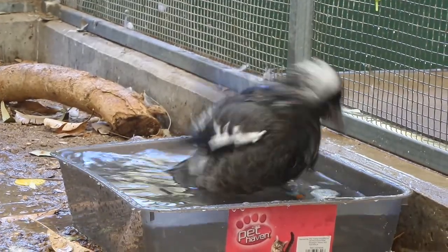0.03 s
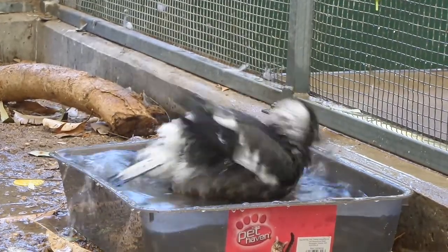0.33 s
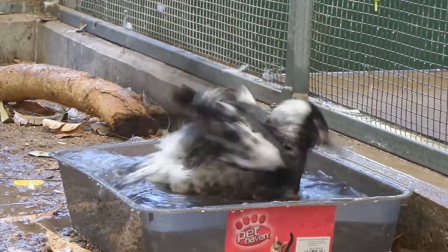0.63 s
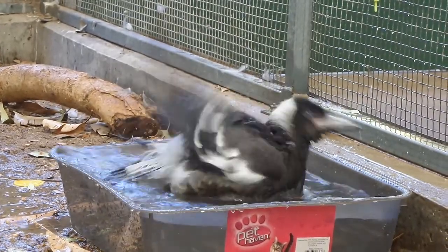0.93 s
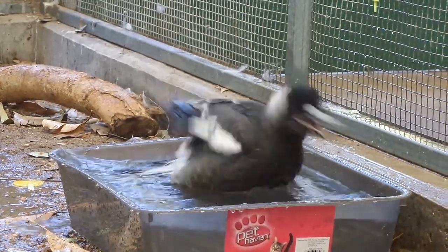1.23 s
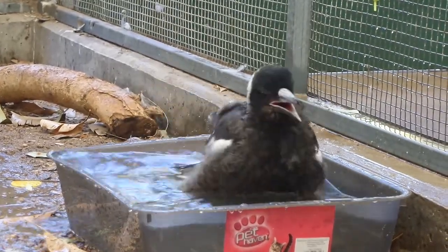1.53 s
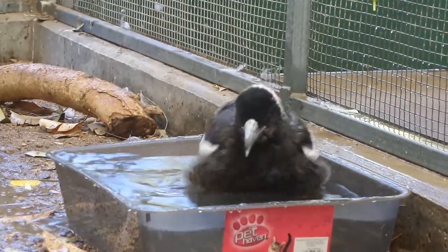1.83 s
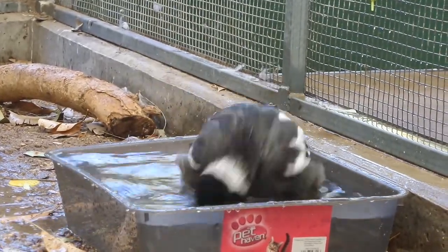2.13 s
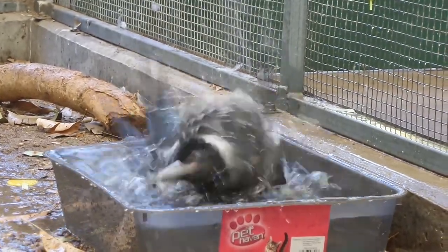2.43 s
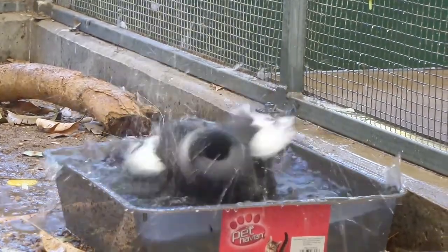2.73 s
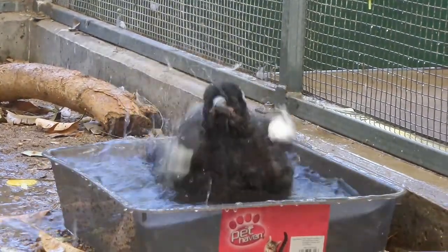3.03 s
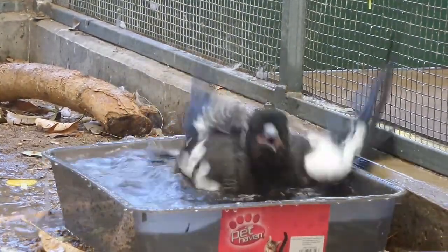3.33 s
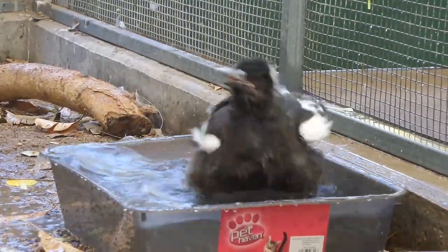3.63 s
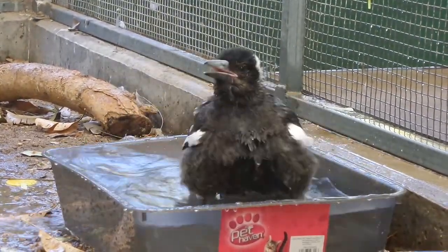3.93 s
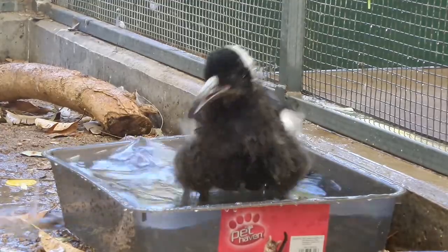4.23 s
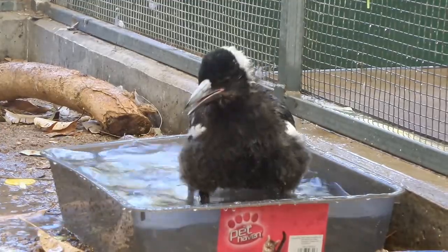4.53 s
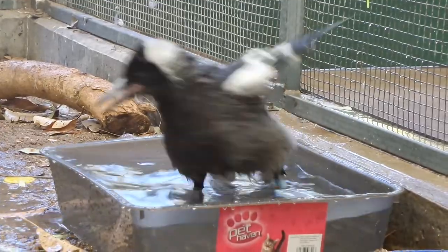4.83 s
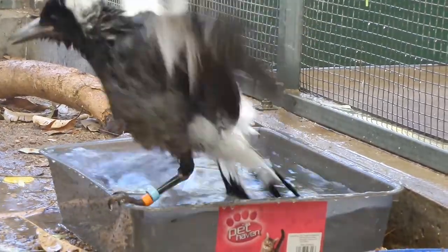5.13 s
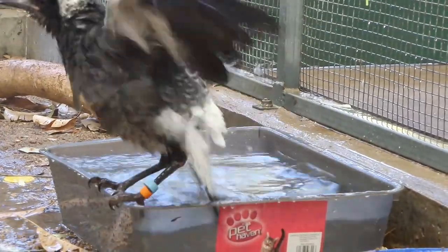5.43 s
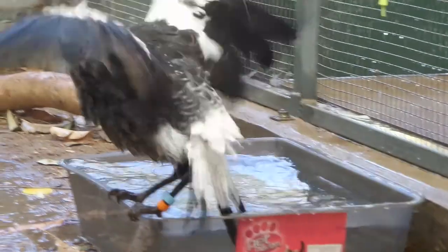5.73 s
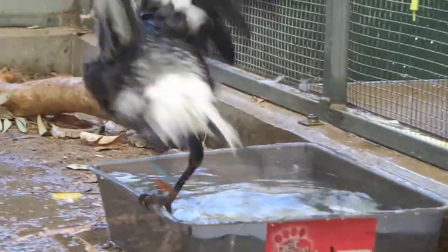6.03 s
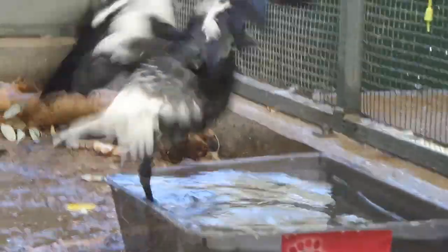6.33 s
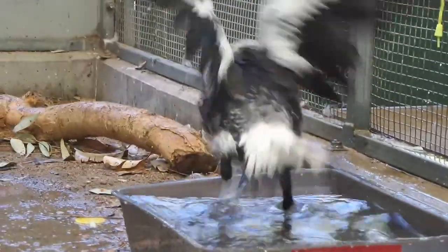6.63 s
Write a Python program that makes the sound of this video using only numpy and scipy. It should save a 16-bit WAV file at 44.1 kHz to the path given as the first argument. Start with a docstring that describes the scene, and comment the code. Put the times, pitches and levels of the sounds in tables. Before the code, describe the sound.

A young magpie bathes in a plastic tub, its wet feathers swishing and throwing spray in quick bouts while the water slops. It gives a short growl, a few whines, then a run of harsh squawks over the heaviest splashing. After a lull with small calls, the flapping returns with more whines and ends with a dull knock on the tub. The sound is close, in an outdoor pen with soft hiss.

```python
"""Magpie in a bathtub

A young magpie thrashes its wet feathers in a plastic tub, throwing spray and slopping the water.
It growls, whines, whistles and squawks with the two sides of its syrinx. Drops and claws tick on the
plastic, and with the last flap a foot knocks the tub. The low concrete walls of the pen answer;
behind it all lie a soft outdoor hiss and a faint machine hum."""
import sys
import numpy as np
from scipy import signal
from scipy.fft import rfft, irfft, next_fast_len
from scipy.io import wavfile
from scipy.ndimage import uniform_filter1d, map_coordinates

SR = 44100
rng = np.random.default_rng(int(sys.argv[2]) if len(sys.argv) > 2 else 0)


def digitize_waveform(pressure):
    """Quantize a signal to 16-bit integers and store it at the path in sys.argv[1].

    Rows of a 2-D input are taken as channels; values are limited to [-1, 1].
    """
    field = np.atleast_2d(pressure).T
    bounded = np.clip(field, -1, 1)
    quanta = np.round(bounded * 32767).astype(np.int16)
    wavfile.write(sys.argv[1], SR, quanta)


N = 295029

# bouts of feather shaking: start_s, length_s, attack_s, first_db, middle_db, last_db, slop_db
BOUTS = [(0, 0.39, 0.023, -42, -42, -37, -77), (0.64, 0.98, 0.021, -42, -37.5, -41, -62),
         (1.797, 0.816, 0.019, -41.5, -39.5, -36, -59), (2.745, .8, 0.0069, -38.5, -37.3, -38.5, -54),
         (5.27, 1, 0.089, -45.5, -41.5, -38.3, -68), (6.425, 0.25, 0.0083, -34.5, -36.5, -37.5, -52)]
# the throat's colour on noisy calls: freq_hz, gain_db
THROAT = [(600, -54), (900, 4), (1500, -10.5), (1950, 12.5), (2450, 4.5), (2900, 0.5), (3400, 4),
          (3900, -17), (6000, -46)]


def amp(db):
    """Decibels to gain."""
    return 10 ** (np.asarray(db) / 20)


def unit(x):
    """x at rms 1."""
    return x / np.sqrt(np.mean(x ** 2) + 1e-20)


def along(points, hz):
    """A curve of (Hz, value) points, read on a log axis."""
    freqs, values = np.transpose(points)
    return np.interp(np.log(hz + 1), np.log(freqs + 1), values)


def arc(u, first, middle, last):
    """A smooth bend through three values as u goes from 0 to 1."""
    return first + (last - first) * u + (middle - (first + last) / 2) * 4 * u * (1 - u)


def wobble(rate, size):
    """A smooth random curve, rate knots a second."""
    knots = rng.standard_normal(size // 8 + 8)
    return map_coordinates(knots, [np.arange(size) * rate / SR], mode="wrap")


def turns(hz):
    """Running phase of a frequency curve."""
    return 2 * np.pi * np.cumsum(hz) / SR


def filtered(x, response):
    """x through a frequency response."""
    n = x.shape[-1]
    padded = next_fast_len(n + 8192)
    return irfft(rfft(x, padded) * response(np.fft.rfftfreq(padded, 1 / SR)), padded)[..., :n]


def coloured(x, spectrum):
    """x through a (Hz, dB) EQ curve, at rms 1."""
    return unit(filtered(x, lambda hz: amp(along(spectrum, hz))))


def spread(pair):
    """Two unrelated signals as left and right: narrow in the bass, wide in the treble."""
    # how alike the two sides are: freq_hz, correlation
    likeness = [(60, 0.84), (150, 0.85), (380, 0.67), (950, 0.22), (2380, -0.008), (5980, -0.0053),
                (15000, -0.0051)]

    def width(hz):
        angle = np.arccos(np.clip(along(likeness, hz), -1, 1)) / 2
        return np.array([np.cos(angle), np.sin(angle)])
    mid, side = filtered(pair, width)
    return unit(np.array([mid + side, mid - side]))


def direct(x, lag_s):
    """Sound straight from the tub reaches the left microphone first."""
    return filtered(x, lambda hz: np.exp(1j * np.pi * hz * lag_s * np.array([[1], [-1]])))


def add(track, start_s, x):
    """Mix x into the track from a start time."""
    i = max(0, round(start_s * SR))
    track[..., i:i + x.shape[-1]] += x[..., :max(0, N - i)]


def grains(count, hz, octaves, cycles, scatter_db, rise):
    """Bubbles or droplets at random moments: damped sines whose pitch rises as they die."""
    onsets = (rng.random(count) * N).astype(int)
    gains = amp(scatter_db * np.minimum(rng.exponential(size=count), 4))
    pitch = np.clip(hz * 2 ** (octaves * rng.standard_normal((count, 1))), 100, SR / 3)
    samples = np.arange(int(np.clip(5 * cycles * SR / hz, 16, 2000)))
    age = pitch * samples / SR / cycles
    waves = gains[:, None] * np.exp(-age) * np.sin(2 * np.pi * cycles * age * (1 + rise * age))
    return unit(np.bincount((onsets[:, None] + samples).ravel(), waves.ravel(), N)[:N])


def shaking(t, release_s=0.049, drip_db=-4):
    """Spray envelope: bouts start fast, hold and die away, over drips that follow the slopping."""
    # hard wing strokes that throw a sheet of spray: centre_s, level_db, half_length_s
    flings = [(1.355, -47, 0.017), (2.166, -39.5, 0.075), (2.34, -33, 0.069), (2.811, -30.5, 0.019),
              (3, -36.5, 0.038), (5.44, -43, .05)]
    power = (amp(drip_db) * slopping(t)) ** 2
    power += sum((amp(db) * np.exp(-((t - centre) / half) ** 2)) ** 2 for centre, db, half in flings)
    for start, length, attack, *levels_db, _ in BOUTS:
        age = t - start
        gate = np.clip(1 + age / attack, 0, 1) * np.exp(-np.maximum(age - length, 0) / release_s)
        power += (gate * amp(arc(np.clip(age / length, 0, 1), *levels_db))) ** 2
    return np.sqrt(power)


def patchy(x, depth_db):
    """The moving wings keep shifting the colour of x."""
    spectra = signal.stft(x, nperseg=512)[2]
    patches = uniform_filter1d(rng.standard_normal(spectra.shape[1:]), size=4, axis=0)
    patches = uniform_filter1d(patches, size=14, axis=1)
    return signal.istft(spectra * amp(depth_db * unit(patches)), nperseg=512)[1][:, :N]


def feathers():
    """Wet feathers swish through the water and shed fine droplets, partly heard off the walls."""
    # colour of the spray: freq_hz, gain_db
    spray = [(300, -35), (600, -19.5), (1100, -11), (1500, -3.5), (2100, -3), (2650, -4), (3300, -6),
             (4200, 0), (4750, -2), (5900, -0.5), (7000, -6), (8450, -1.5), (10400, -12.5), (16000, -14)]
    # hollow resonances in the swish: centre_hz, width_hz, gain_db
    hollows = [(2150, 350, 5), (4730, 260, 6), (5800, 300, 2), (8450, 600, 2)]

    def resonances(f):
        return amp(sum(db / (1 + (2 * (f - hz) / width) ** 2) for hz, width, db in hollows))
    droplets = np.array([grains(count=9000, hz=6000, octaves=.9, cycles=1, scatter_db=2.5, rise=.02)
                         for path in range(3)])
    swish = coloured(rng.standard_normal((3, N)) + .4 * droplets, spray)
    swish = filtered(patchy(swish, depth_db=1.1), resonances)
    ruffle_db = .35 * wobble(17, N) + .6 * wobble(38, N) + .65 * wobble(150, N)
    stereo = unit(spread(swish[:2]) + amp(-7.5) * unit(direct(swish[2], lag_s=.00041)))
    return shaking(np.arange(N) / SR) * amp(1.5 + ruffle_db) * stereo


def slopping(t, build_s=0.16, settle_s=0.24, ripple_db=-61.5):
    """Wave envelope: the water builds during each bout and settles to a ripple after it."""
    power = amp(ripple_db) ** 2
    for start, length, *_, slop_db in BOUTS:
        built = 1 - np.exp(-np.clip(t - start, 0, length) / build_s)
        settling = np.exp(-np.maximum(t - start - length, 0) / settle_s)
        power = power + (amp(slop_db) * built * settling) ** 2
    return np.sqrt(power)


def water(slap_attack_s=0.0052, slap_decay_s=0.083):
    """The slopping water traps bubbles; each wing slap stirs up a crackle of smaller ones."""
    # wings slapping up small waves: start_s, level_db
    slaps = [(1.188, -46.5), (1.37, -56), (2.596, -44.5), (6.425, -52)]
    # colour of the slop: freq_hz, gain_db
    bubble_eq = [(120, -60), (200, -20), (314, -21.5), (1180, -10), (1430, -24), (1600, -28), (2080, -33),
                 (3520, -120)]
    # colour of the slaps: freq_hz, gain_db
    churn_eq = [(250, -3), (600, -7), (1500, -4.5), (3000, -17), (6000, -19)]
    t = np.arange(N) / SR
    bubbles = np.array([grains(count=1800, hz=601.6, octaves=.677, cycles=8.24, scatter_db=-2, rise=.0823)
                        for ear in "LR"])
    churn = np.array([grains(count=8000, hz=1600, octaves=.7, cycles=2.5, scatter_db=2.5, rise=.04)
                      for ear in "LR"])
    stirred = np.zeros(N)
    for start, db in slaps:
        attack = np.clip((t - start) / slap_attack_s + 1, 0, 1)
        stirred += amp(db) * attack * np.exp(-np.maximum(t - start, 0) / slap_decay_s)
    slop = slopping(t) * spread(coloured(bubbles, bubble_eq))
    return slop + stirred * spread(coloured(churn, churn_eq))


def outdoors():
    """A bed of outdoor hiss and the hum of a distant machine."""
    # partials of the hum: pitch_hz, level_db
    partials = [(48.4, -67.5), (96.9, -70)]
    # colour of the hiss: freq_hz, gain_db
    air = [(22, -30), (45, -8), (115, -5), (250, -12.5), (320, -3.5), (394, -22), (512, -5.5), (850, -16),
           (1650, -3.5), (4400, -8), (7000, -6), (8600, -1.5), (12200, -11), (15800, -10)]
    t = np.arange(N) / SR
    hum = sum(amp(db) * unit(np.sin(2 * np.pi * hz * t + .08 * wobble(2.4, N))) for hz, db in partials)
    hiss = amp(-46 + 0.75 * wobble(5.36, N)) * spread(coloured(rng.standard_normal((2, N)), air))
    return hum + hiss


def sing(calls, voice, fade_s):
    """Play each call on a voice, faded at both ends; u runs from 0 to 1 through the call."""
    track = np.zeros(N)
    t = np.arange(SR // 2) / SR - fade_s
    for start, length, *shape in calls:
        gate = np.clip(1 + np.minimum(t, length - t) / fade_s, 0, 1)
        add(track, start - fade_s, gate * voice(np.clip(t / length, 0, 1), length, *shape))
    return track


def swell(u, swell_db, arch_db=2.5):
    """Level through a note in dB: an arch that leans towards its start or its end."""
    return arc(u, -arch_db, 0, -arch_db) + swell_db * (u - .5)


def flutter(rate_hz, uneven, size):
    """Uneven flapping of the syrinx: its phase, and its pulses at rms 1."""
    phase = turns(rate_hz * (1 + uneven * wobble(40.8, size)))
    return phase, unit((1 + np.cos(phase)) * amp(0.73 * wobble(53.5, size)))


def growls():
    """Slack membranes rattle on a sinking pitch: each pulse is a falling chirp with a burst of rasp."""
    # rattling growls: start_s, length_s, first_hz, last_hz, tone_db, rasp_db, swell_db
    calls = [(.24, .195, 852, 623, -43, -40.5, 0), (4.86, .14, 1040, 798, -41.5, -38.5, -5.5)]
    # colour of the rasp: freq_hz, gain_db
    rasp_eq = [(600, -26), (950, -11), (1300, -12.5), (2100, -6.5), (2600, -16), (3200, -23), (6000, -35)]
    # the throat's bass cut: freq_hz, gain_db
    gullet = [(430, -29), (600, -4)]

    def voice(u, length, first_hz, last_hz, tone_db, rasp_db, swell_db):
        n = len(u)
        pitch = first_hz * (last_hz / first_hz) ** u
        beat, pulses = flutter(rate_hz=72, uneven=0.058, size=n)
        phase = turns(pitch * (1 - .12 * np.sin(beat) + .075 * wobble(800, n)))
        tone = coloured(pulses * np.sin(phase), gullet)
        noise = coloured(rng.standard_normal(n) * (1 + 0.29 * np.cos(phase)), rasp_eq)
        rasp = unit((pulses + 5.5) * noise)
        return amp(swell(u, swell_db) + 2.5) * (amp(tone_db) * tone + amp(rasp_db) * rasp)
    return sing(calls, voice, fade_s=.008)


def tub():
    """Sharp ticks on the plastic, and the dull knock of the water-filled tub."""
    # drops and claws on the plastic: start_s, level_db, body_relative_db
    ticks = [(0.5144, -60, 3), (0.607, -55, -11), (1.331, -48, -25), (1.344, -50, -16), (2.302, -42, -6),
             (3.0007, -47, -11), (6.4249, -52.5, 3)]
    # a foot bumping the tub: start_s, level_db
    bumps = [(6.584, -32.5)]
    # the tub's modes: pitch_hz, level_db, t60_s
    modes = [(357, -12, 0.2), (453, 6.5, 0.044), (500, -5, 0.089)]
    track = np.zeros((2, N))
    t = np.arange(SR // 4) / SR

    def burst(eq, t60_s):
        return coloured(rng.standard_normal((2, len(t))), eq) * amp(-60 * t / t60_s)
    for start, db, body_db in ticks:
        crack = burst([(3000, -27), (7000, 4), (15000, -14)], t60_s=0.027)
        body = burst([(600, -17), (1500, 6), (4500, -4), (7000, -39)], t60_s=0.015)
        add(track, start, amp(db + 18.5) * (crack + amp(body_db + 1) * body))
    ring = sum(amp(db - 60 * t / t60) * np.sin(2 * np.pi * hz * t) for hz, db, t60 in modes)
    soft_attack = 1 - np.exp(-t / 0.0024)
    for start, db in bumps:
        add(track, start, amp(db - 5) * soft_attack * ring)
    return track


def whines(trill_growth=0.36):
    """The throat favours the second harmonic; a deepening trill chops it, bends it and makes it hoarse."""
    # begging notes: start_s, length_s, first_hz, middle_hz, last_hz, level_db, swell_db,
    # fundamental_relative_db, trill_depth
    calls = [(1.537, 0.0091, 847, 1010, 1160, -26.5, -3, -12, 0.36),
             (1.566, 0.052, 1181, 1194, 1170, -32, -13, -12, 0.66),
             (1.632, 0.11, 1153, 1074, 1050, -27.5, -8, -17.5, 0.67),
             (2.08, 0.088, 882, 886, 854, -35, -15, -39, 0.58),
             (3.911, 0.076, 877, 1035, 971, -27.5, -10.5, -19.5, 0.08),
             (4.277, 0.062, 1073, 1151, 1085, -33, -5, -10, 1),
             (4.365, 0.11, 1045, 992, 943, -35, 5, -8.5, 0.92),
             (5.645, 0.17, 1058, 1079, 1025, -41, -9, -1, 1),
             (5.862, 0.083, 864, 826, 913, -28.5, -6, -39, .6),
             (6.055, 0.081, 956, 917, 978, -26.5, -3, -35, 0.05),
             (6.16, 0.073, 943, 950, 958, -25, -3, -29, 0.32),
             (6.272, 0.11, 977, 1043, 1016, -32, -6, -13.5, 0.77)]

    def voice(u, length, first_hz, middle_hz, last_hz, db, swell_db, fundamental_db, trill):
        n = len(u)
        pitch = arc(u, first_hz, middle_hz, last_hz)
        depth = np.clip(trill * (1 + trill_growth * (u - .5)), 0, 1)
        beat, pulses = flutter(rate_hz=74, uneven=0.09, size=n)
        bend = depth * (0.029 * np.sin(beat) + 0.061 * wobble(700, n))
        phase = turns(pitch * (1 + bend + 0.006 * wobble(190.5, n)))
        # the third harmonic lights up as it crosses this resonance
        windpipe = amp(-16.5) / np.hypot(1, (3 * pitch - 2950) / 70)
        tone = np.sin(2 * phase) + amp(fundamental_db) * np.sin(phase) + windpipe * np.sin(3 * phase)
        rasp = amp(-24) * depth * coloured(rng.standard_normal(n), THROAT)
        chop = 1 - depth + depth * pulses
        return amp(db + swell(u, swell_db) + 3) * chop * (tone + rasp)
    return sing(calls, voice, fade_s=0.0063)


def whistles():
    """The other side of the syrinx glides: pure when taut and high, hoarse when slack and low."""
    # whistled notes: start_s, length_s, first_hz, last_hz, level_db, swell_db
    calls = [(1.556, 0.048, 1333, 1283, -34, -11), (1.622, 0.053, 1313, 1228, -35, -2),
             (4.29, 0.14, 1320, 1160, -44, -14), (4.842, 0.014, 1440, 1390, -41.5, -3),
             (5.705, 0.13, 1806, 1791, -31.5, 18)]

    def voice(u, length, first_hz, last_hz, db, swell_db):
        pitch = first_hz + (last_hz - first_hz) * u
        slack = np.clip(1 - pitch / 1850, 0, 1)
        phase = turns(pitch * (1 + (0.0056 + 0.098 * slack) * wobble(626, len(u))))
        tone = unit(np.sin(phase) + amp(-30) * np.sin(2 * phase))
        return amp(db + swell_db * (u - .5) - 0.5) * tone
    return sing(calls, voice, fade_s=0.012)


def screech(pitch, fundamental_db, treble_db, rough):
    """Forced hard, the membranes turn chaotic: the harmonics smear into noise."""
    # the beak's colour on the treble: freq_hz, gain_db
    beak = [(2400, -17), (2800, 14), (3300, 10), (3750, 19), (4500, -5.5), (5100, 3), (5700, 7.5),
            (7000, -12), (10000, -15.5), (15000, -10)]
    n = len(pitch)
    phase = turns(pitch * (1 + rough * 0.0374 * wobble(915, n) + 0.007 * wobble(125, n)))
    chaos = np.clip(0.47 * rough, 0, 1)

    def smear(tone, eq):
        hiss = coloured(rng.standard_normal(n) * (1 + 0.67 * np.cos(phase)), eq)
        return np.sqrt(1 - chaos) * tone + np.sqrt(chaos) * hiss
    fundamental = amp(fundamental_db - 16.5) * unit(np.sin(phase))
    core = smear(unit(np.sin(2 * phase)), THROAT)
    overtones = sum(np.sin(k * phase) for k in range(3, 10))
    treble = amp(treble_db) * smear(coloured(overtones, beak), beak)
    shudder = amp(2.2 * rough * wobble(220, n))
    return shudder * (fundamental + core + treble)


def squawks(push_db=4, screech_db=6, dulling_db_per_octave=14.5, settle_s=0.0098):
    """Two loud, clearer pushes with a bright screech between; the pitch settles, then mostly flicks up."""
    # harsh squawks: start_s, length_s, first_hz, held_hz, last_hz, level_db, swell_db,
    # fundamental_relative_db, treble_relative_db, roughness
    calls = [(2.258, 0.058, 1324, 1273, 1380, -31, 7, 3.5, -0.5, .65),
             (2.326, 0.031, 1007, 1037, 1050, -28, 0, -3, -38, 0.48),
             (2.595, 0.021, 945, 900, 897, -43, -2, 9, -4, 0.86),
             (2.645, 0.053, 937, 909, 908, -39, -3, 12, -2.5, 1.2),
             (2.753, 0.097, 1147, 953, 1335, -30, -3.5, 2.5, 0, 0.88),
             (2.909, .095, 968.4, 940.6, 1335, -25, 0.5, 0, -3.5, 0.61),
             (3.065, 0.079, 1287, 1007, 1210, -23.5, 1.5, -15, -2, 0.76),
             (3.235, 0.096, 1128, 985, 1332, -23.5, -3, -15, -11.5, 0.54)]
    # the pushes, as shares of a squawk's length: centre, half_width
    pushes = [(.15, 0.058), (.68, 0.25)]

    def voice(u, length, first_hz, held_hz, last_hz, db, swell_db, fundamental_db, treble_db, rough):
        effort = sum(np.exp(-((u - centre) / width) ** 2) for centre, width in pushes)
        settling = np.exp(-u * length / settle_s)
        flick = 1 / (1 + np.exp((.72 - u) / 0.0642))  # a smooth step late in the call
        pitch = held_hz + (first_hz - held_hz) * settling + (last_hz - held_hz) * flick
        level_db = db + push_db * (effort - 1) + swell_db * (u - .5)
        dulling_db = dulling_db_per_octave * np.log2(pitch / held_hz)
        bright_db = treble_db + screech_db * (1 - effort) - dulling_db
        roughness = rough * np.clip(1.55 - 0.61 * effort, 0, 2)
        return amp(level_db + 2.5) * screech(pitch, fundamental_db, bright_db, roughness)
    return sing(calls, voice, fade_s=.006)


def pen(x, lag_s, near_db, near_t60_s, tail_db):
    """Direct sound, a quick scatter off the tub and the ground, and a faint tail from the walls."""
    # decay between the concrete walls: freq_hz, t60_s
    decay = [(200, 0.057), (1000, 0.64), (2200, 0.37), (5000, 0.47), (12000, 0.025)]
    hz, t, spectra = signal.stft(rng.standard_normal((2, SR // 2)), SR, nperseg=256)
    tail = signal.istft(spectra * amp(-60 * t / along(decay, hz)[:, None]), SR, nperseg=256)[1]
    age = np.arange(tail.shape[1]) / SR
    near = rng.standard_normal(tail.shape) * amp(-60 * age / near_t60_s) * (age > .001)
    echo = amp(near_db) * near / np.linalg.norm(near[0]) + amp(tail_db) * tail / np.linalg.norm(tail[0])
    return amp(-4.5) * direct(x, lag_s) + signal.fftconvolve(x[None], echo, axes=1)[:, :N]


def scene():
    """The bird calling in the pen, over its bath and the outdoor bed."""
    bird = squawks() + whines() + whistles() + growls()
    calls = pen(bird, lag_s=.00012, near_db=-8, near_t60_s=.035, tail_db=-11)
    return calls + feathers() + water() + tub() + outdoors()


def record(dry, top_hz=15850):
    """Each microphone has its own colour; nothing passes above the band limit."""
    # stereo tilt of the microphones: freq_hz, left_minus_right_db
    tilt = [(100, -3.5), (500, -3), (1100, -1), (2000, -5.5), (3200, -6), (5000, -2.5), (6500, -2.5),
            (8200, 4), (10500, 1), (15000, 1)]

    def microphones(hz):
        gains = amp(along(tilt, hz) * np.array([[.5], [-.5]]))
        return gains / np.sqrt(np.mean(gains ** 2, axis=0)) * (hz < top_hz)
    return filtered(dry, microphones)


dry = scene()
out = record(dry)
digitize_waveform(out)
```